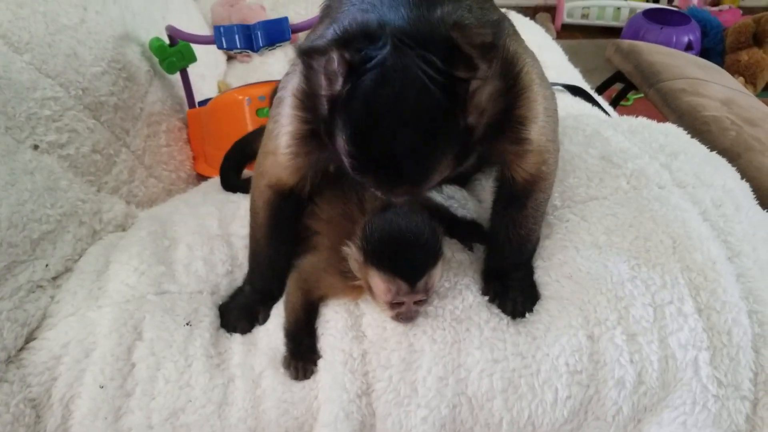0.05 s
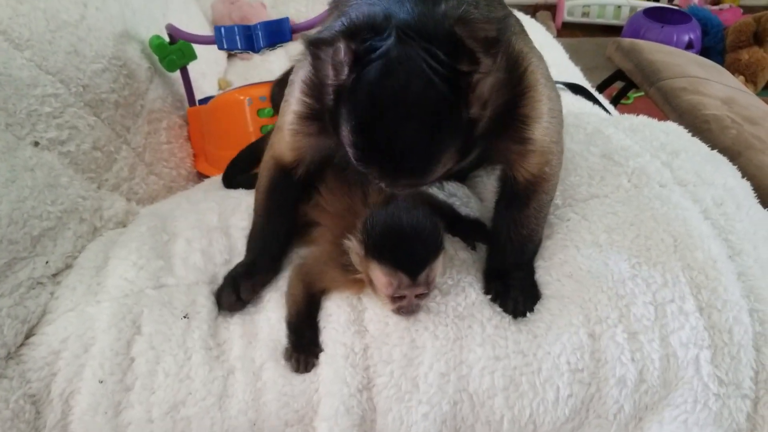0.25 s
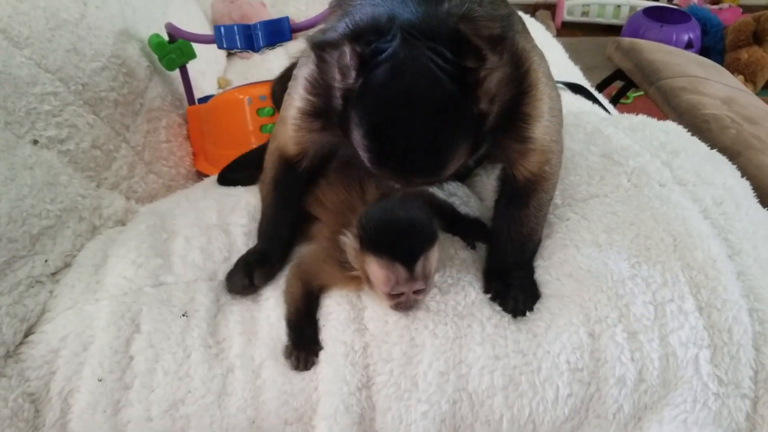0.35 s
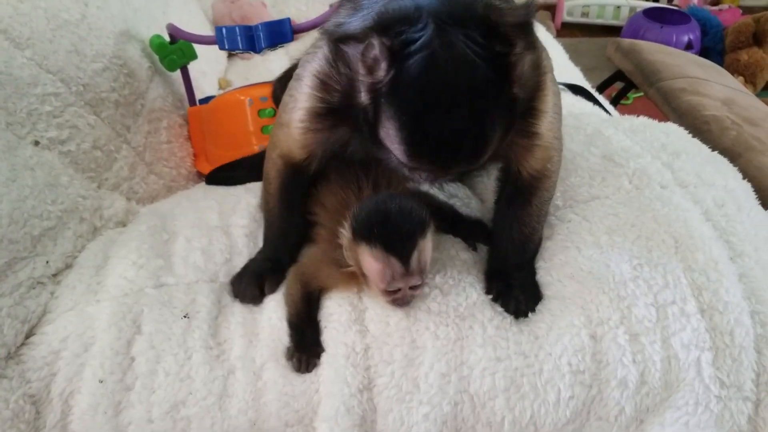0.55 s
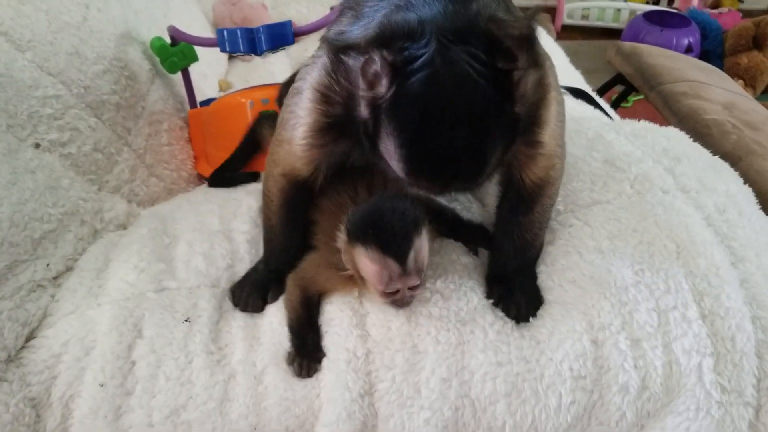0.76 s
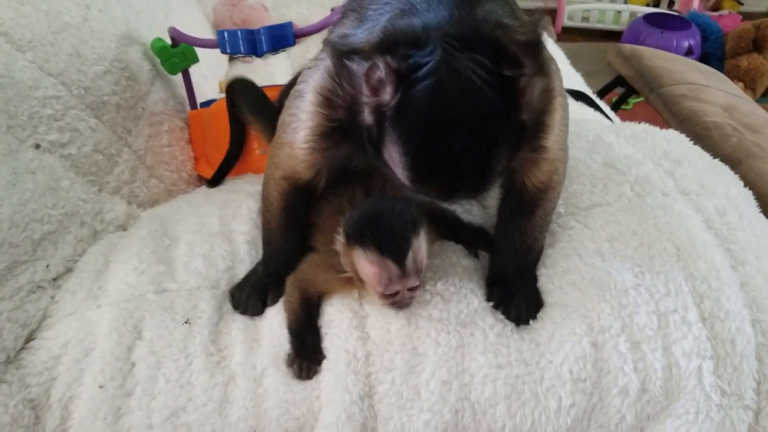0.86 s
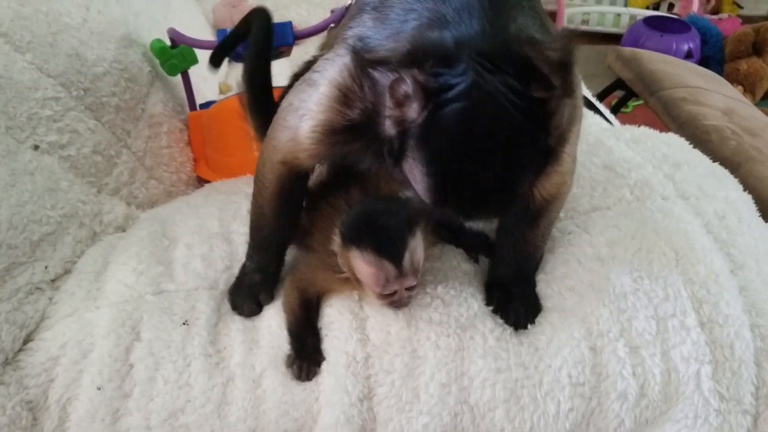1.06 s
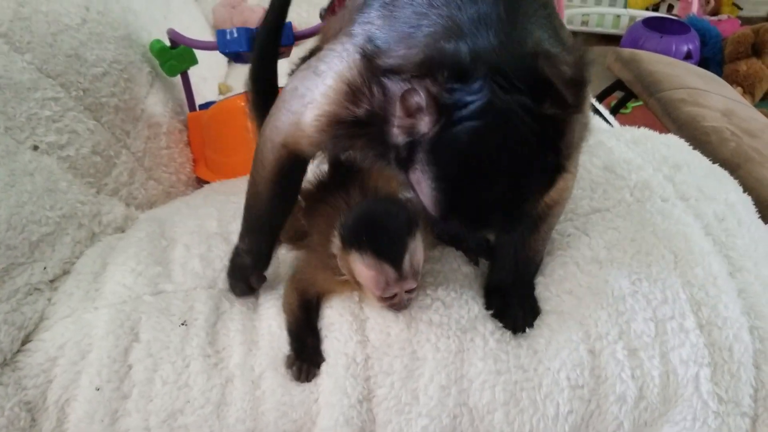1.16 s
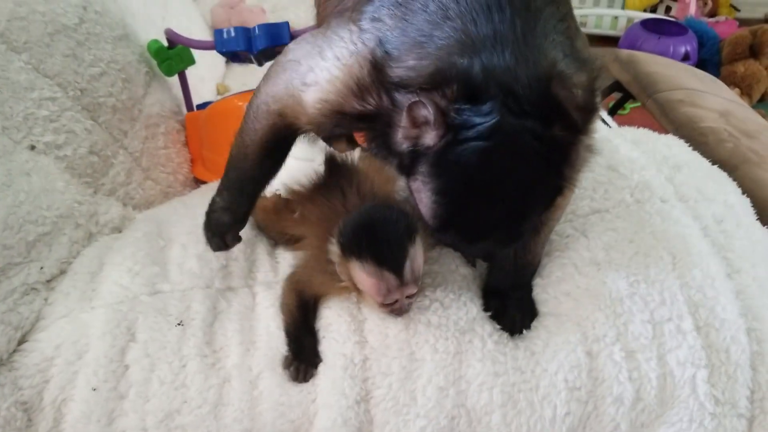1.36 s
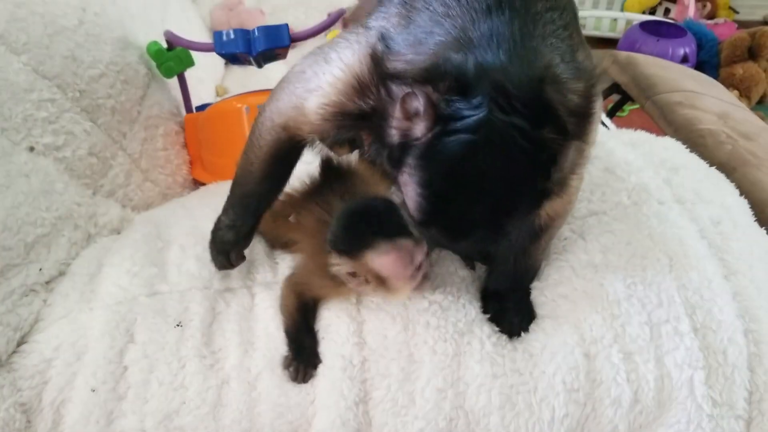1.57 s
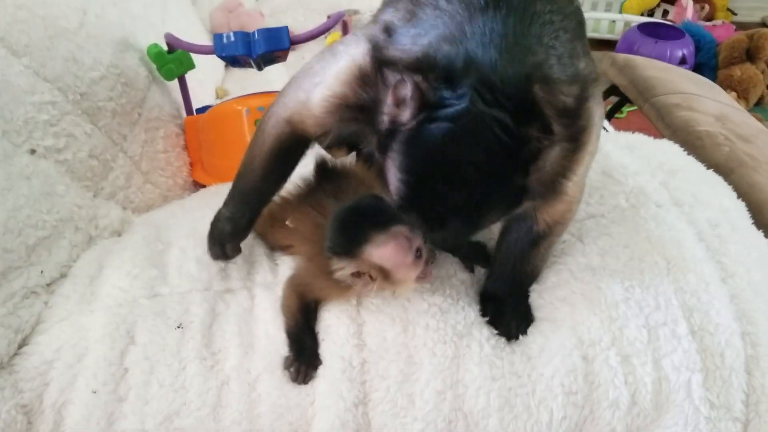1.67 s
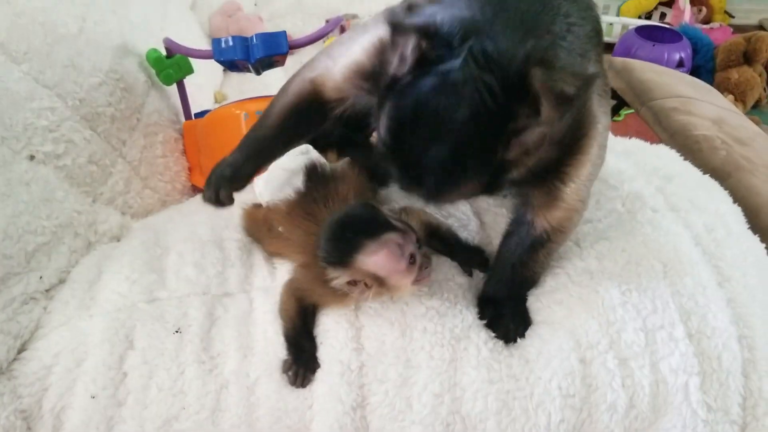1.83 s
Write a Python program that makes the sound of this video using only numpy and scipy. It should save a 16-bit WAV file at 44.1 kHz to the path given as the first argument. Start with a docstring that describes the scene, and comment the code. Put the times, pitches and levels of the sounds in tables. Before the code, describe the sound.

A small monkey gives two high squeaks, with soft snuffles and light knocks on plastic.

```python
"""Two small monkeys play on a blanket indoors, close to a phone with two microphone ports.
A brief noise dies away over port hiss and a low drone from outside. Snuffles, two mouth clicks and a
knock on a plastic toy, echoed off a near surface, lead into a falling, whistled squeak that rings in
the room and leaves a faint, late echo. The drone fades; a faint knock and a shorter squeak follow,
then fur and a paw brush the blanket, the toy is tapped again and the snuffling trails off."""
import sys
import numpy as np
from scipy import signal
from scipy.fft import rfft, irfft
from scipy.io import wavfile
from scipy.ndimage import uniform_filter1d

SR = 44100
rng = np.random.default_rng(int(sys.argv[2]) if len(sys.argv) > 2 else 0)


def to_wav(sig):
    """Store sig (one row per channel, or 1-D mono) as 16-bit WAV at the path in sys.argv[1].

    Samples outside -1..1 are clipped; the rate is SR.
    """
    pcm = np.clip(np.atleast_2d(sig), -1, 1) * 32767
    pcm = np.round(pcm).astype(np.int16)
    wavfile.write(sys.argv[1], SR, pcm.T)  # frames by channels


N = 83790
T = np.arange(N) / SR
FREQS = np.fft.rfftfreq(N, 1 / SR)


def amp(db):
    return 10 ** (np.asarray(db) / 20)


def ports(left_db, right_db):
    return amp([[left_db], [right_db]])


def unit_rms(x):
    return x / np.sqrt(np.mean(x ** 2) + 1e-20)


def at_hz(points, hz):
    f, value = np.transpose(points)
    return np.interp(np.log(hz + 1), np.log(f + 1), value)


def envelope(points):
    """Gain over time from rows of seconds and dB, silent outside them."""
    s, db = np.transpose(points)
    return amp(np.interp(T, s, db, left=-200, right=-200))


def add(mix, start, sound):
    part = mix[:, round(start * SR):][:, :sound.shape[1]]
    part += sound[:, :part.shape[1]]


def wander(*windows):
    """Random drift: noise smoothed over each window (in samples) in turn."""
    drift = rng.standard_normal(N)
    for size in windows:
        drift = uniform_filter1d(drift, size)
    return unit_rms(drift)


def noise_spectra(likeness):
    """Noise spectra for the two ports, from unrelated (0) to identical (1)."""
    left, other = rfft(rng.standard_normal((2, N)))
    likeness = np.clip(likeness, 0, 1)
    return np.array([left, likeness * left + np.sqrt(1 - likeness ** 2) * other])


def bands(table, likeness):
    """Noise in resonances, each with its own level at the two ports."""
    noise, out = noise_spectra(likeness), np.zeros((2, N))
    for centre, width, left_db, right_db in table:
        peak = 1 / (1 + (2 * (FREQS - centre) / width) ** 4)
        out += ports(left_db, right_db) * unit_rms(irfft(peak * noise, N))
    return out


def room(sound, start_s=.012, build_s=.016):
    """Sparse reflections, different at each port, build up and die away, treble first."""
    # Each row: frequency in Hz, seconds to fall 60 dB.
    decay = [(500, .5), (2000, 0.31), (3800, 0.29), (7500, 0.28), (12000, 0.2)]
    taps = np.zeros((2, SR // 2))
    slots = np.arange(0, SR // 2 - 20, 20)
    arrivals = slots + rng.integers(0, 20, (2, len(slots)))
    np.put_along_axis(taps, arrivals, rng.choice([-1., 1.], arrivals.shape), 1)
    hz, t, spectra = signal.stft(taps, SR, nperseg=256)
    tail = signal.istft(spectra * amp(-60 * t / at_hz(decay, hz)[:, None]), SR, nperseg=256)[1]
    t = np.arange(tail.shape[1]) / SR
    tail *= np.sqrt(np.clip((t - start_s) / build_s, 0, 1))
    return signal.fftconvolve(sound, tail / np.linalg.norm(tail[0]), axes=1)[:, :N]


def port_hiss():
    """Steady microphone hiss over a low rumble that is much alike at both ports."""
    # Each row: frequency in Hz, relative spectral level in dB.
    colour = [(12, -44.5), (20, -8.5), (107, -3.5), (130, -7), (146, -14.5), (198, -18), (328, -27.5),
              (590, -31.5), (642, -30), (897, -33), (2320, -34), (12800, -37), (16000, -32)]
    # Each row: frequency in Hz, likeness of the ports.
    likeness = [(60, 0.88), (180, 0.87), (550, 0.18), (1650, 0.0), (4970, -0.06), (15000, 0.24)]
    # Each row: frequency in Hz, left over right in dB.
    balance = [(60, 1.7), (180, 1.4), (550, -0.23), (1650, 0.504), (4970, -0.5), (15000, 0.0)]
    tilt_db = at_hz(balance, FREQS) / 2
    noise = noise_spectra(at_hz(likeness, FREQS)) * amp([tilt_db, -tilt_db])
    return amp(-66.5) * unit_rms(irfft(noise * amp(at_hz(colour, FREQS)), N))


def outside_drone():
    """Low wavering tones and a soft roar come in from outside, then fade."""
    # Each row: pitch in Hz, level in dB before the swell.
    tones = [(37, -83), (70, -70), (113, -64.5), (185, -82.5)]
    # Each row: centre and width in Hz, left and right level in dB before the swell.
    roar = [(270, 170, -82.5, -83)]
    # Each row: time in seconds, gain in dB.
    swell = [(0, -10), (.08, 2.5), (.45, -0.5), (.75, 1), (.85, -15), (1.1, -22)]
    waver_hz, hum = 2., np.zeros(N)
    for hz, db in tones:
        pitch = hz + waver_hz * wander(2500)
        hum += np.sqrt(2) * amp(db) * np.sin(2 * np.pi * np.cumsum(pitch) / SR)
    return envelope(swell) * (hum * ports(.6, -.6) + bands(roar, likeness=.8))


def dying_noise(t60=.27):
    """A broad noise that dies away in the first moments."""
    # Each row: centre and width in Hz, left and right starting level in dB.
    colour = [(700, 640, -63, -63.5), (2000, 2500, -70.5, -71), (12000, 5000, -67.5, -60.5)]
    return amp(-60 * T / t60) * bands(colour, likeness=.5)


def snuffles_echo_and_rustles():
    """Grainy noise: air through a small nose, a squeak's late echo, fur and a paw on the blanket."""
    # Each row: time in seconds, level in dB. Of the four airy swells, the second is a faint,
    # late echo of the first squeak; the others are snuffles.
    airy_swells = [
        [(0, -71.5), (.03, -80.5), (.07, -66), (.1, -76), (.17, -62), (.23, -57.5)],
        [(.5, -94), (.6, -85.5), (.68, -92.5)],
        [(1.2, -94), (1.235, -71.5), (1.3, -74), (1.44, -72), (1.47, -73), (1.58, -92)],
        [(1.72, -92.5), (1.77, -86), (1.79, -90.5), (1.82, -84.5), (1.9, -84)],
    ]
    fur_stroke = [(1.29, -104), (1.35, -77), (1.41, -75), (1.465, -71), (1.475, -84.5), (1.52, -101.5)]
    paw_shift = [(1.27, -98), (1.31, -89.5), (1.35, -83), (1.4, -94.5)]
    # Each row: centre and width in Hz, left and right gain in dB.
    airy_bands = [(3967, 750, -8, 7), (7530, 1400, -7, -22.5), (12400, 2500, -11.5, -9)]
    fur_bands = [(6280, 1150, 5.4, -4), (8500, 3500, 3.8, -17)]
    paw_bands = [(626, 130, 3, -2.5), (1230, 440, 0.5, -4)]
    grain = amp(1.5 * wander(300))
    airy = sum(map(envelope, airy_swells)) * bands(airy_bands, likeness=.6)
    fur = envelope(fur_stroke) * bands(fur_bands, likeness=.3)
    paw = envelope(paw_shift) * bands(paw_bands, likeness=.97)
    return grain * (airy + fur + paw)


def mouth_clicks(cycles=3):
    """Tiny mouth clicks, each a few cycles of a high tone, with a little room."""
    # Each row: start in seconds, peak in dB, pitch in Hz, left over right in dB.
    clicks = [(.0272, -62, 5300, 8), (.0473, -44, 5200, 5)]
    t, direct = np.arange(300) / SR, np.zeros((2, N))
    for start, db, hz, pan_db in clicks:
        age = t * hz / cycles * np.e  # the click peaks at age 1
        click = age * np.exp(1 - age) * np.sin(2 * np.pi * hz * t)
        add(direct, start, amp(db) * ports(pan_db / 2, -pan_db / 2) * click)
    return direct + amp(-7) * room(direct)


def toy_knocks(crack_t60=.025, contact_s=.00015, right_lag_s=.0002):
    """A knocked plastic toy: a rough contact rings short modes under a bright crack."""
    # Each row: start in seconds, then level, crack gain, left over right and room gain in dB.
    # The second row is the first knock's quick echo off a near surface.
    arrivals = [(.0658, -41.5, -4.5, -3, -3), (.0738, -40.5, -17.5, 10.5, -0.5), (1.007, -68.5, -8, 0, -10),
                (1.4555, -62, 6, 2.5, -12)]
    # Each row: frequency in Hz, relative level in dB, seconds to fall 60 dB.
    modes = [(370, -19, .04), (553, -5, .04), (660, -5, .03), (937, 1.5, 0.023), (1250, -2.5, 0.017),
             (1750, -1.5, 0.017), (2305, -8.5, .015)]
    # Each row: centre and width in Hz, left and right gain in dB.
    crack_bands = [(2980, 1200, -11.5, -19), (4030, 900, -5, 2.5), (4950, 900, -9.5, -12),
                   (7400, 4000, -1.5, -18.5), (12600, 4000, -11.5, -12)]
    t, direct, to_room = np.arange(3000) / SR, np.zeros((2, N)), np.zeros((2, N))
    age = np.array([t, t - right_lag_s])
    ring = sum((-1) ** k * amp(db - 60 * age / t60) * np.sin(2 * np.pi * hz * age) * (age > 0)
               for k, (hz, db, t60) in enumerate(modes))
    noise = bands(crack_bands, likeness=.6)
    contacts = rng.standard_normal((len(arrivals), 300)) * np.exp(-t[:300] / contact_s)
    for k, (start, db, crack_db, pan_db, room_db) in enumerate(arrivals):
        body = signal.lfilter(contacts[k], 1, ring)
        crack = amp(crack_db - 60 * t / crack_t60) * noise[:, k * len(t):(k + 1) * len(t)]
        clack = body / abs(body).max() + crack
        add(direct, start, amp(db) * ports(pan_db / 2, -pan_db / 2) * clack)
        add(to_room, start, amp(db + room_db) * clack)
    return direct + room(to_room, start_s=.002, build_s=.006)


def squeak(contour, harmonics, rasp_db):
    """A fluttering, airy whistle; overtones bloom with effort and reach each port differently."""
    # Each row: centre and width in Hz, left and right gain in dB.
    rasp_bands = [(5300, 1500, -41, -43), (10400, 1800, -42.5, -52.5), (13320, 4000, -52.5, -48)]
    # Echoes off near surfaces. Each row: delay in seconds, left and right gain in dB.
    echoes = [(.0031, -14, -25), (.0062, -15.5, -21.5), (.0105, -20.5, -23.5)]
    jitter, flutter_db, edge_s = .0015, .75, .0043
    bloom, roughness = .8, .2  # both count for more with each higher harmonic
    s, hz, db = np.transpose(contour)
    pitch = uniform_filter1d(np.interp(T, s, hz), size=90)
    phase = 2 * np.pi * np.cumsum(pitch * (1 + jitter * wander(80, 80))) / SR
    effort_db = uniform_filter1d(np.interp(T, s, db), size=90) + flutter_db * wander(80, 80)
    gate = np.sin(np.pi / 2 * np.clip(np.minimum(T - s[0], s[-1] - T) / edge_s, 0, 1)) ** 2
    fall = 10 * (1 - pitch / hz[len(hz) // 2])  # in steps of 10% below the middle row's pitch
    direct = gate * amp(effort_db + rasp_db) * bands(rasp_bands, likeness=.3)
    to_room = amp(-8) * direct
    for k, row in enumerate(harmonics):
        close_db, lead, room_db, fall_db = np.split(np.array(row)[:, None], [2, 3, 5])
        bloom_db = k * bloom * (effort_db - db.max())
        strength = np.sqrt(2) * gate * amp(effort_db + bloom_db + fall_db * fall)
        strength *= 1 + roughness * max(k - 1, 0) * wander(40, 40)  # from the third harmonic up
        direct += strength * amp(close_db) * np.sin((k + 1) * phase + lead * [[1], [0]])
        to_room += strength * amp(room_db) * np.sin((k + 1) * phase)
    out = direct + room(to_room)
    for delay, left_db, right_db in echoes:
        add(out, delay, ports(left_db, right_db) * direct)
    return out


def monkey_squeaks():
    """Two calls close to the phone: the first falls, the shorter second one mostly rises."""
    # One list per squeak. Each row: time in seconds, pitch in Hz, effort in dB.
    contours = [
        [(.13, 4400, -80), (.165, 4035, -57), (.197, 4003, -53.5), (.208, 3960, -38), (.216, 3885, -23.5),
         (.226, 3865, -21), (.236, 3705, -20), (.242, 3533, -23.5), (.2465, 3285, -33.5)],
        [(1.238, 3240, -66), (1.246, 3292, -42), (1.252, 3336, -27), (1.260, 3387, -28), (1.267, 3456, -31),
         (1.272, 3360, -27)],
    ]
    # Harmonics 1-4 per squeak. Each row: left and right close gain in dB, left phase lead in radians,
    # left and right room gain in dB, left and right gain in dB per 10% fall in pitch.
    harmonics = [
        [(-11, 7, 0.99, -23, -13.5, 4.5, 1), (-1, -24.5, 0.73, -22, -31.5, 2.5, 9.1),
         (-20.5, -26.5, 1.3, -40.5, -35, 7, 3.3), (-43.5, -40, 1.7, -48, -45, 14, 12)],
        [(-4.5, 3, 5.5, -20, -11.5, 0.83, 0.66), (-4.5, -21, -8.5, -20, -26, 1, 0.84),
         (-74, -47, 10, -63, -71, 1, 0.98), (-50, -36, 4.5, -55.5, -36, 0.91, 0.93)],
    ]
    rasp_db = [-2, -13.5]
    return sum(map(squeak, contours, harmonics, rasp_db))


def scene():
    monkeys = monkey_squeaks() + toy_knocks() + mouth_clicks() + snuffles_echo_and_rustles()
    return monkeys + port_hiss() + outside_drone() + dying_noise()


def record(dry):
    """The phone cuts off the treble above 15.8 kHz."""
    lowpass = signal.firwin(511, 15800, window=("kaiser", 9), fs=SR)
    return signal.oaconvolve(dry, lowpass[None], "same")


dry = scene()
out = record(dry)
to_wav(out)
```